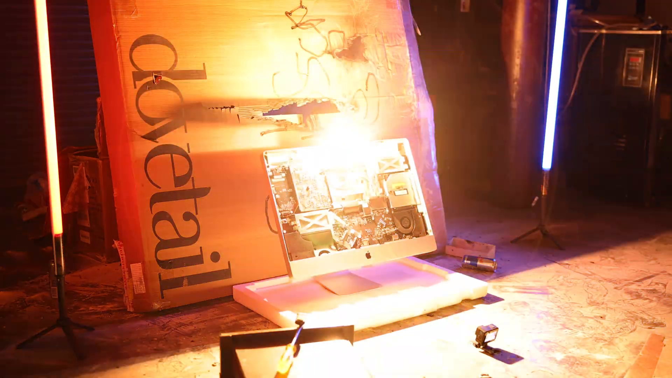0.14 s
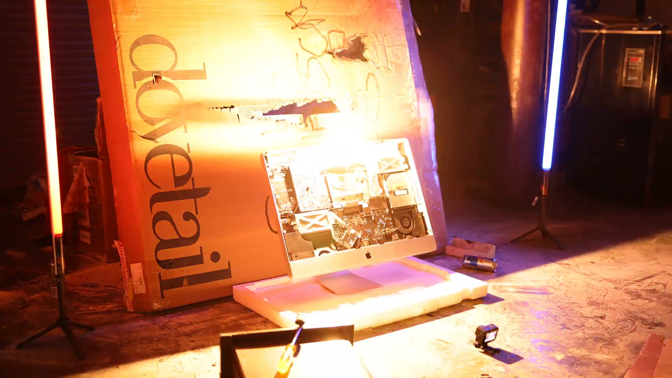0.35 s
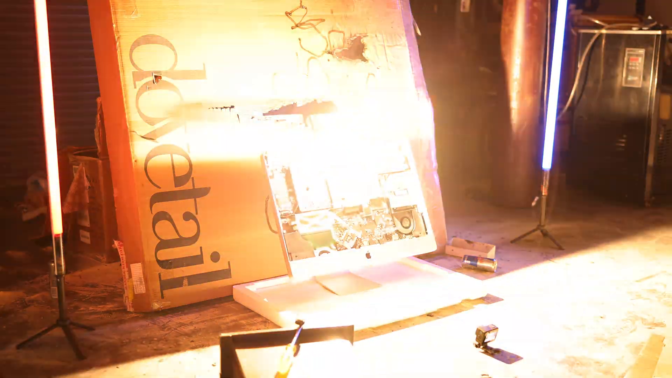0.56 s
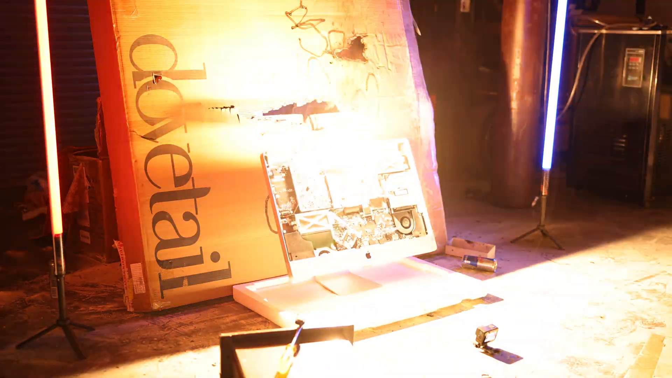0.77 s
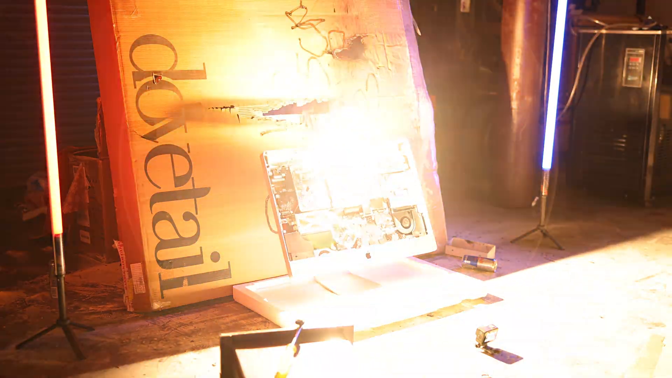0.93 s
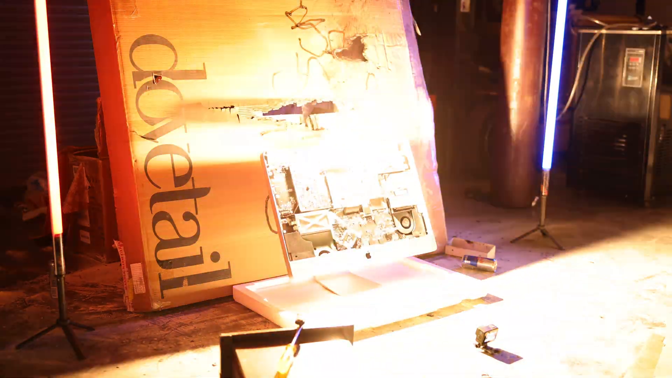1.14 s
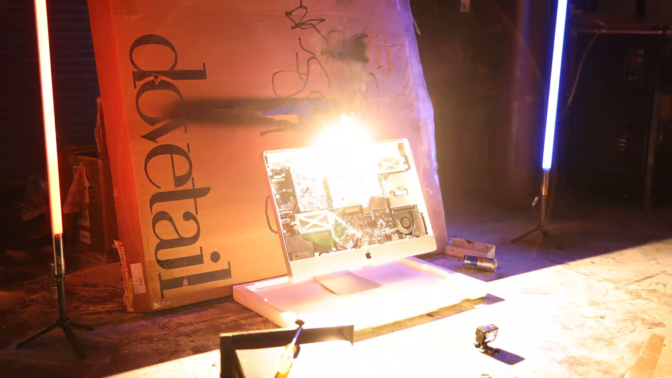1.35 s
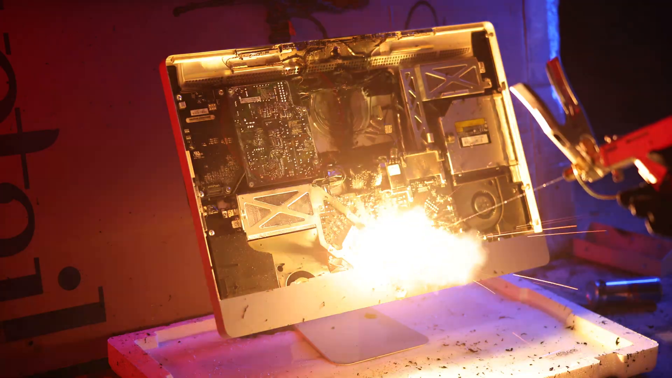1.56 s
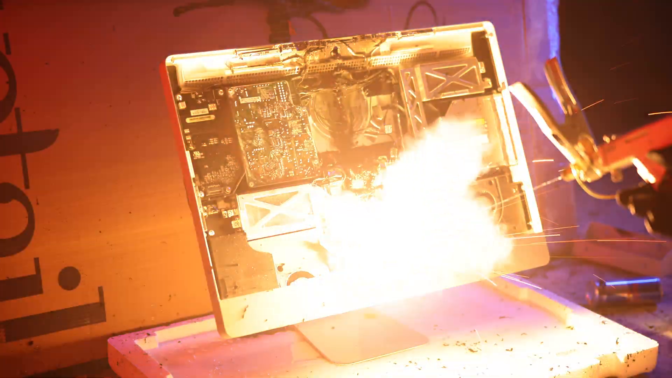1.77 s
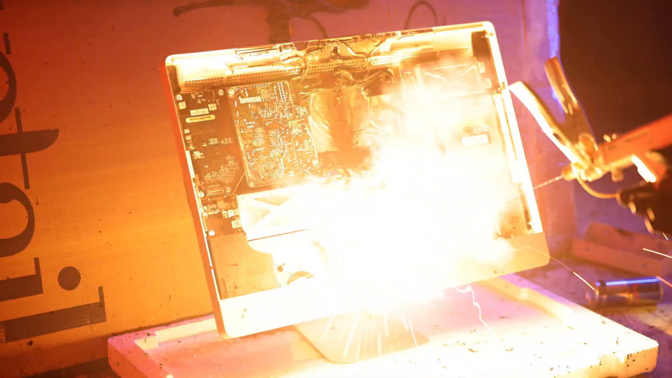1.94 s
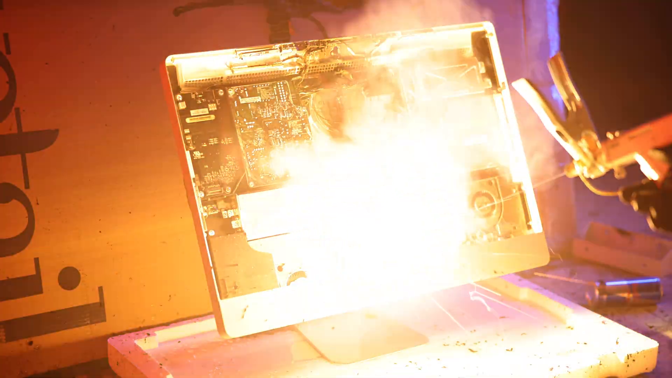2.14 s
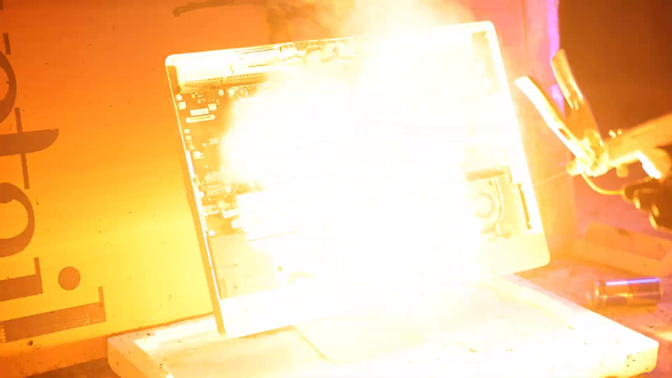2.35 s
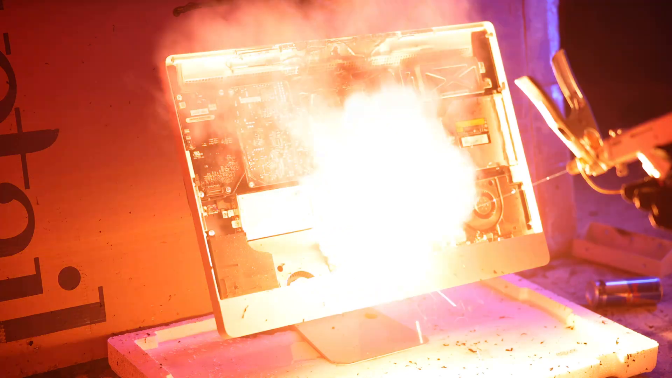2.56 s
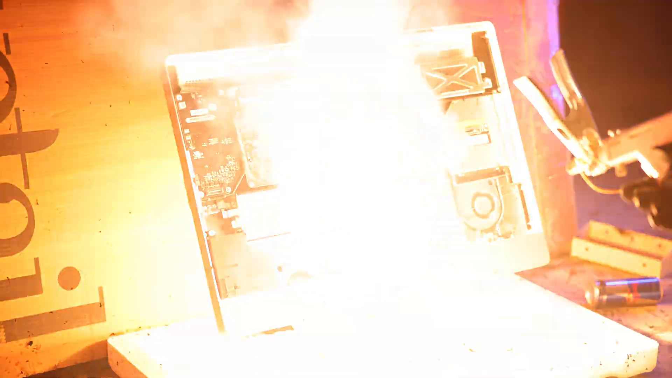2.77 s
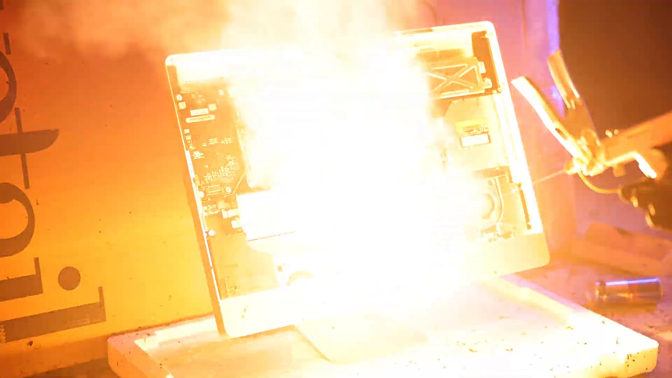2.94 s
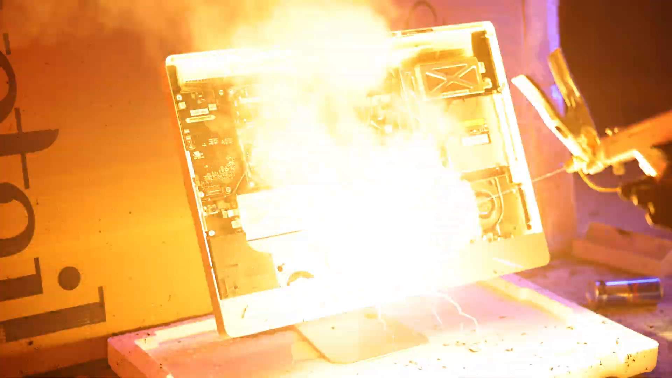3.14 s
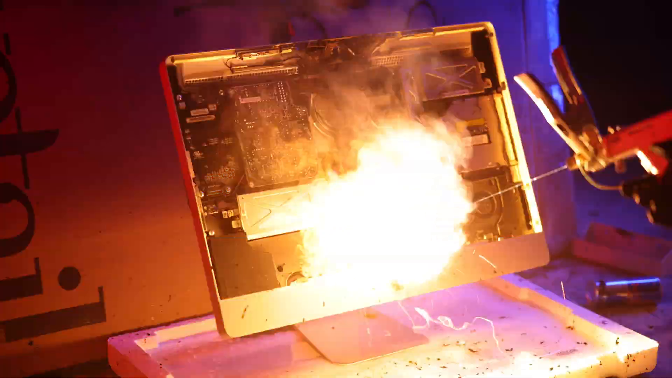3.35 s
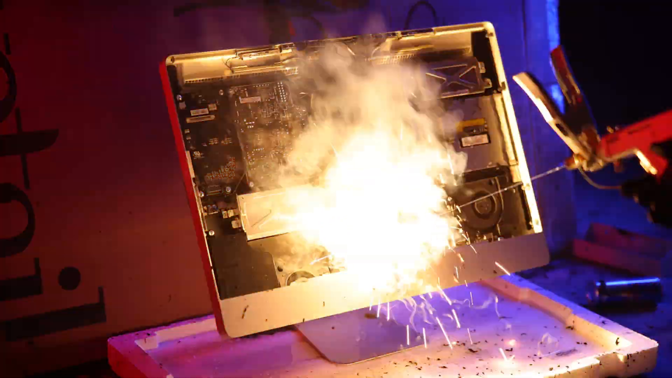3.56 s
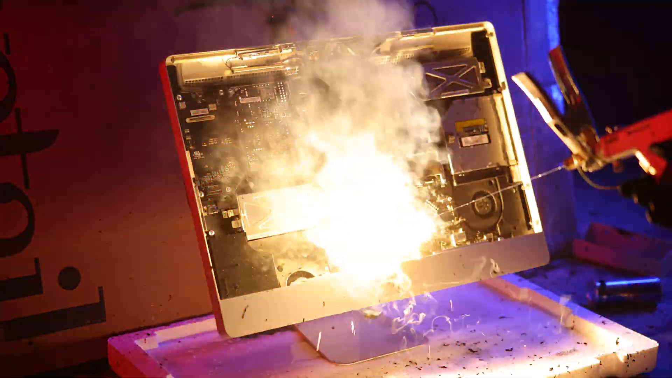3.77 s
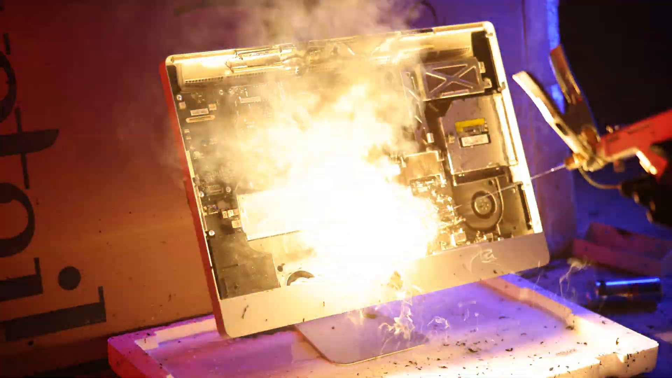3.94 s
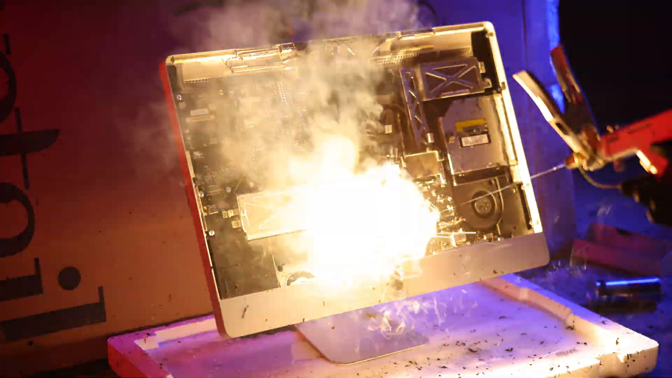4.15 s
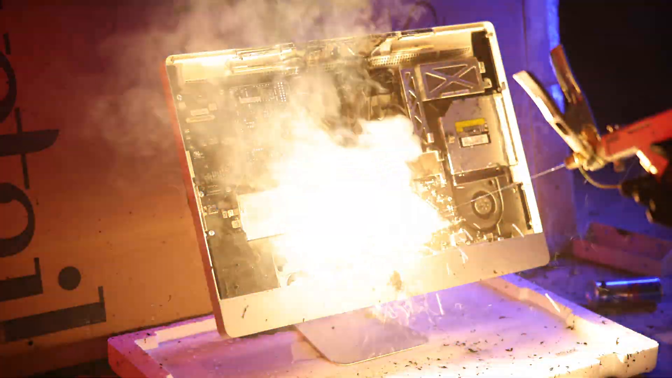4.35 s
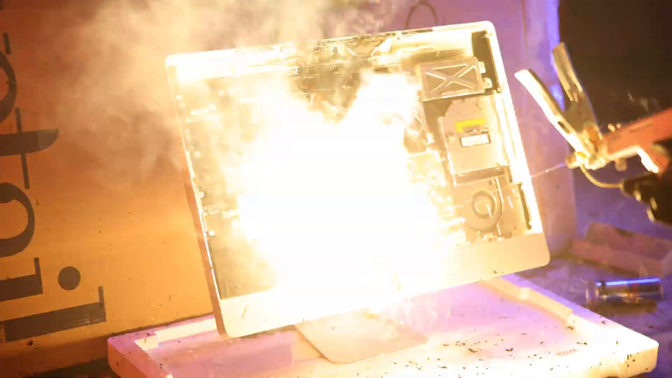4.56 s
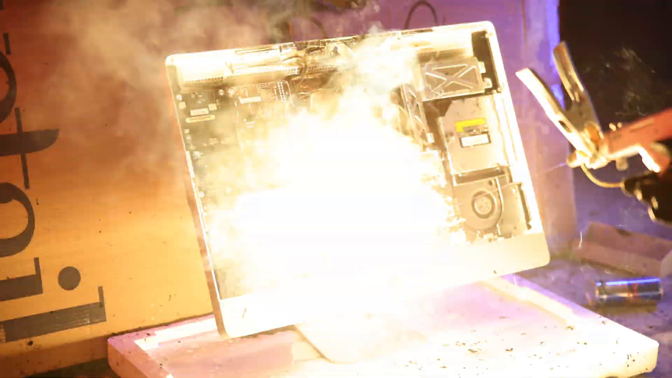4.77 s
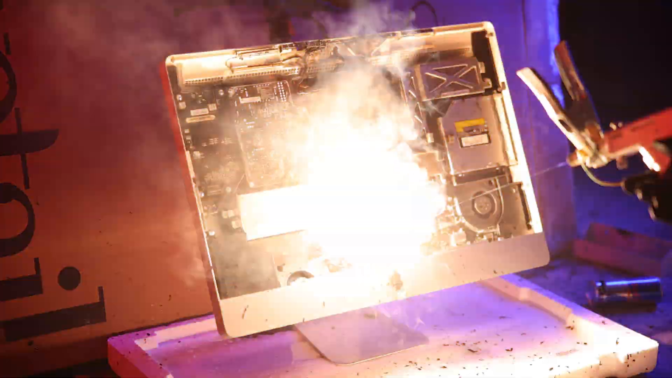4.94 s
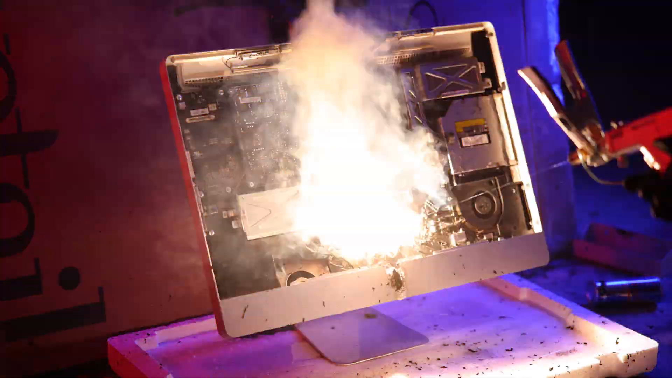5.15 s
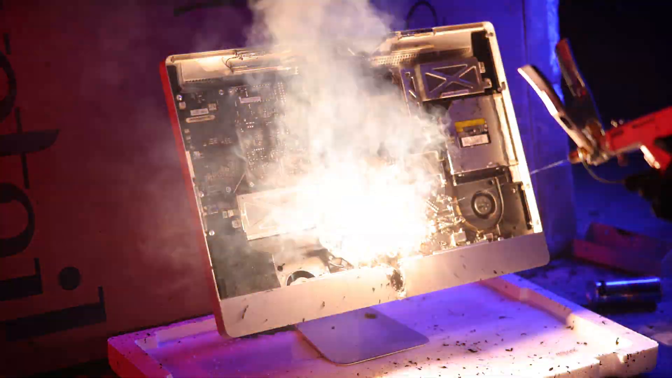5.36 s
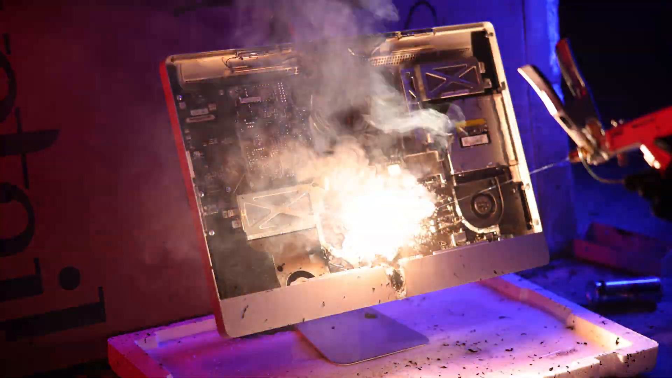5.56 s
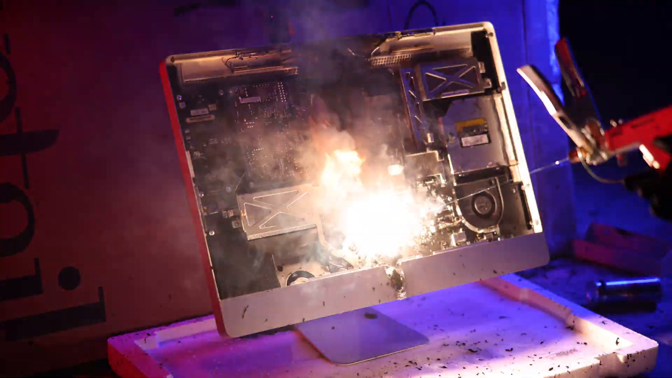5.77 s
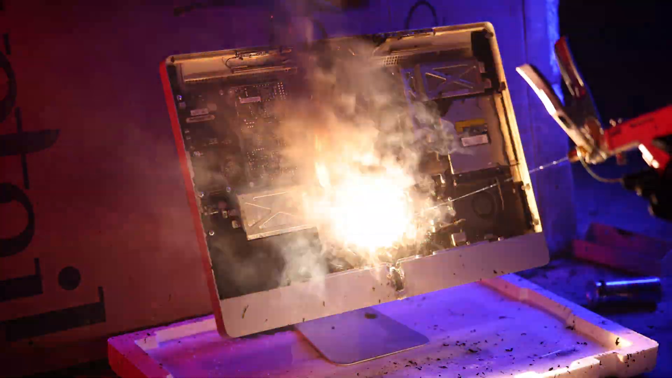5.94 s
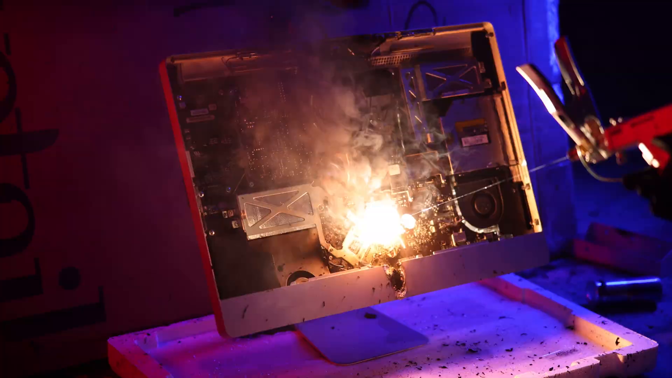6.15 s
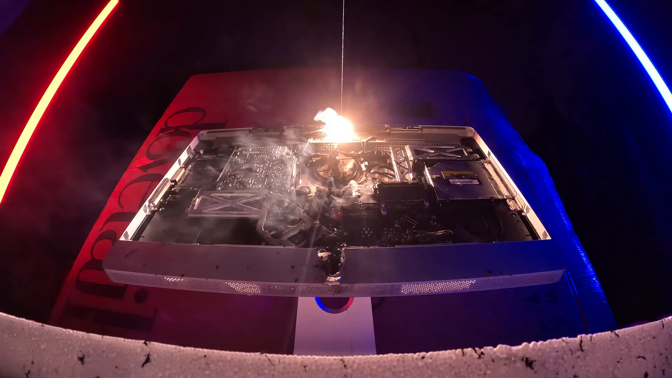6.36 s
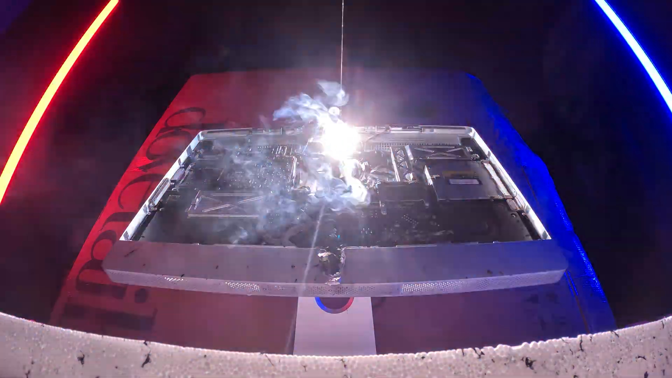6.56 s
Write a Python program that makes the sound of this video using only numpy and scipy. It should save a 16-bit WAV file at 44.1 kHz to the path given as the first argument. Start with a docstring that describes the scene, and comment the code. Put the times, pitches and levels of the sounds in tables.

```python
"""Laser burning into an open computer chassis

A faint flame flutters across the workshop; then, heard close, jets of vapour roar, sizzle and spit over mains
hum; at the end a stereo microphone stands beside the humming machine. The jets are turbulent noise with droplet
impulses, filtered by the resonances of a deepening hole; bursting parts send N-shaped shocks; hum is sines.
"""
import sys
import numpy as np
from scipy import signal
from scipy.fft import rfft, irfft
from scipy.io import wavfile

SR = 44100
rng = np.random.default_rng(int(sys.argv[2]) if len(sys.argv) > 2 else 0)


def inscribe(sig):
    """Save sig as 16-bit PCM at rate SR to the path in sys.argv[1].

    A 1-D sig is mono; a 2-D sig holds one channel per row.
    Samples are clipped to [-1, 1] before scaling.
    """
    pcm = np.round(np.clip(np.atleast_2d(sig).T, -1, 1) * 32767)
    wavfile.write(sys.argv[1], SR, pcm.astype(np.int16))


N = 291501

TAIL_T60_S = 0.35   # time for the fading tail of an earlier loud sound to fall 60 dB


def burn():
    """Source and resonator: a sputtering jet excites the hole, and gusts and spits modulate four bands of it."""
    # resonances of the hole at each stage: (centre [Hz], nominal width [Hz], relative level [dB])
    open_board = [(240, 295, 2), (495, 389, 4), (1054, 133, -6), (1499, 36, -5), (2296, 650, -5.5),
                  (3063, 340, -6.5), (3483, 210, -7), (4640, 870, -10), (5540, 660, -15.5), (6700, 360, -5),
                  (9060, 820, -16.5), (11800, 650, -10), (13700, 430, -28), (15200, 850, -22)]
    shallow_pit = [(296, 256, 0.5), (597, 194, 4.5), (1005, 120, -2.5), (1603, 104, -2.5), (2300, 490, 2.5),
                   (3160, 370, -0.5), (4100, 740, -8.5), (5100, 320, -2.5), (5600, 350, -11.5),
                   (6900, 680, 4.5), (8700, 640, -7), (10920, 560, -2.5), (11900, 940, -9),
                   (13300, 500, -9), (14600, 1400, -21)]
    deep_pit = [(298, 210, -12.5), (567, 240, -0.5), (1097, 185, -7.5), (1550, 174, -4), (1783, 127, -4),
                (2347, 280, 1.5), (3485, 510, -6.5), (4300, 320, -9.5), (5320, 790, -12), (5920, 290, -3.5),
                (6530, 250, -5), (6980, 160, -0.5), (7320, 400, -17), (8740, 440, -8), (11070, 740, -23),
                (12700, 410, -19), (14400, 1000, -39)]
    # spectrum of the broad noise between the resonances: (frequency [Hz], relative density [dB per Hz])
    jet_spectrum = [(20, -45), (60, -41), (120, 12.5), (250, 2.5), (600, -5), (1200, 5.5), (3000, -12.5),
                    (8000, 5.5), (11000, -4.5), (16000, -12.5)]
    # mains hum: (frequency [Hz], level [dB rms])
    hum_lines = [(118.4, -59.5)]
    deepens_s, crossfade_s = (3.48, 4.95), 0.18   # middle of each change of stage, and its length
    edges_hz = 70, 1350, 4700, 9900, 17000   # limits of roar, sizzle, hiss and spray
    spit_parts_db = -19.5, -8.5, 0, -13   # the same four in a spit, against its treble level
    # (resonances, broad noise [dB], flicker [dB]): the shallow pit chokes and clears the most
    stages = [(open_board, -9.0, 2.2), (shallow_pit, -9.0, 4.3), (deep_pit, -12.0, 1.8)]

    t = np.arange(N) / SR
    stage = sum(np.clip((t - s) / crossfade_s + .5, 0, 1) for s in deepens_s)
    parts = np.zeros((4, N))
    for k, (peaks, broad_db, flicker_db) in enumerate(stages):
        jet = sputter(1500.0, 4.48, -5.0, flicker_db)
        body = resonances(jet, peaks, patchy_db=2.7) + amp(broad_db) * coloured(jet, jet_spectrum)
        share = np.sqrt(np.clip(1 - abs(stage - k), 0, 1))   # equal-power crossfade
        parts += [share * unit(band(body, low, high)) for low, high in zip(edges_hz, edges_hz[1:])]
    gains = gusts()
    bursts = amp(np.c_[spit_parts_db].T) * spits(gains[2])
    # spits are the same jet, briefly stronger: powers add
    direct = np.sum(parts * np.hypot(gains, bursts), axis=0) + cracks()
    return direct + walls(direct) + tones(hum_lines, 2.6) + room_air()


def gusts():
    """Amplitude modulation: each gust rises fast, holds while it swells or sags, and falls into the lull."""
    # gusts: (start [s], hold [s], roar [dB], sizzle [dB], hiss [dB], swell during the hold [dB])
    gust_rows = [(1.532, 0.01, -28.5, -26.5, -31, -4.5), (1.606, 0.038, -35, -32.5, -32, 3.5),
                 (1.715, 0.067, -32.5, -26.5, -25.5, 1.5), (1.801, 0.015, -30.0, -24.5, -28, 4.5),
                 (1.865, 0.014, -24, -20, -20, -0.5), (1.899, 0.041, -28.5, -25, -26.0, 5),
                 (1.986, 0.064, -26.5, -28, -31.5, 6.0), (2.109, 0.029, -30, -33, -36.5, 6.5),
                 (2.209, 0.018, -24.5, -23, -26.5, -3.0), (2.252, 0.1, -19, -17.5, -21, -11),
                 (2.358, 0.045, -28, -25, -27, 1), (2.431, 0.096, -30.5, -29.5, -29, -0.5),
                 (2.55, 0.048, -44.5, -45, -48.5, 10.5), (2.64, 0.01, -36.0, -33.5, -29.5, 7.0),
                 (2.677, 0.072, -38, -36.0, -34, -6), (2.763, 0.094, -33.5, -33.0, -35.0, 5.5),
                 (2.913, 0.041, -31.5, -30.5, -29.0, 2.5), (3.029, 0.083, -30.5, -29.0, -22, -15.0),
                 (3.098, 0.05, -31.0, -35, -36.5, 2.5), (3.188, 0.063, -52.0, -38.5, -44.5, -3.5),
                 (3.259, 0.025, -34.5, -42.0, -53, 4.5), (3.381, 0.088, -29.5, -36.5, -38.5, -20),
                 (3.567, 0.11, -73.0, -62, -41.5, -1), (3.682, 0.12, -39, -30, -29, -9.5),
                 (3.838, 0.006, -49, -61, -44, 6.5), (3.909, 0.005, -45.5, -51, -40, -4),
                 (3.943, 0.087, -52, -40, -38.5, 14), (4.017, 0.082, -42.0, -34.5, -31.5, -7.5),
                 (4.126, 0.054, -52.0, -46.5, -37.5, 3.0), (4.197, 0.16, -55.0, -55, -49.5, -6),
                 (4.448, 0.0095, -38.5, -41.0, -39.5, -9.5), (4.484, 0.042, -46, -49, -44, -11),
                 (4.56, 0.047, -50, -42.5, -41.5, -1.0), (4.633, 0.054, -42.0, -36.0, -34.0, 5.5),
                 (4.699, 0.082, -34.5, -35, -32.5, -4.0), (4.87, 0.033, -33.5, -35.5, -35.5, 3.0),
                 (4.919, 0.049, -37.5, -33.0, -27, -10.0), (5.012, 0.068, -35.5, -37, -40.5, 0.0),
                 (5.098, 0.065, -43, -39.0, -35, 9.5), (5.189, 0.11, -43.5, -38.0, -31.5, 1),
                 (5.313, 0.055, -50, -36.5, -29.5, 3.0), (5.391, 0.053, -59, -39.5, -42, -0.5),
                 (5.51, 0.092, -47, -34, -31.5, -2.0), (5.644, 0.024, -54, -47, -45, -1),
                 (5.718, 0.096, -62, -40.0, -33.5, 3.5), (5.833, 0.0034, -37.5, -30.5, -30.5, 5),
                 (5.858, 0.064, -45, -35.5, -29, 1.0), (5.953, 0.04, -39.5, -33.5, -32, -1.5),
                 (6.022, 0.049, -48, -46, -38, -1.5), (6.109, 0.045, -62, -44.0, -34.5, -7.5),
                 (6.225, 0.012, -60, -63, -46.5, 6.0), (6.294, 0.066, -63.0, -36.5, -39, -6.0),
                 (6.365, 0.055, -59.0, -39, -29.5, -4.5)]
    # burn between gusts, and spray relative to the whole hiss, gusts included:
    # (time [s], roar [dB], sizzle [dB], hiss [dB], relative spray [dB])
    lull_rows = [(1.54, -44.5, -46, -39, -6), (1.85, -27, -30.5, -48, -7.5), (2.17, -38, -40.5, -44, -13.5),
                 (2.62, -38.5, -46, -51, -8.5), (3.0, -41.5, -40.0, -32.5, -9),
                 (3.34, -44, -59, -55.5, -10.0), (3.53, -58, -61, -55, -6.5), (3.9, -63, -58.0, -59, -12.5),
                 (4.4, -56, -64, -58, -4.5), (4.85, -45, -49, -48, -12.5), (5.0, -39.5, -40.5, -44, -11.5),
                 (5.47, -53, -47.5, -41.5, -12.5), (5.7, -44.5, -41.5, -42, -15.5),
                 (6.2, -58.5, -59, -52.0, -7.5), (6.41, -48.5, -41, -35.0, -20.0)]
    rise_db_per_s, fall_db_per_s = 900, 470
    ignition_s = 1.5362
    smoulder_db = -61, -77, -77, -88   # before the beam bites: roar, sizzle, hiss, spray

    t = np.arange(N) / SR
    *lull_db, spray_db = in_time(lull_rows)
    power = amp(2 * np.array(lull_db))
    for s, hold_s, *parts_db, swell_db in gust_rows:
        near = slice(round((s - .05) * SR), round((s + hold_s + .15) * SR))
        hold_s = max(hold_s, .002)
        u = t[near] - s
        rise_db = rise_db_per_s * np.minimum(u, 0)
        held_db = swell_db * np.clip(u / hold_s, 0, 1)
        fall_db = fall_db_per_s * np.maximum(u - hold_s, 0)
        power[:, near] += amp(2 * (np.c_[parts_db] + rise_db + held_db - fall_db))
    spray_power = power[2] * amp(2 * spray_db)
    gains = np.sqrt(np.vstack([power, spray_power]))
    return np.where(t < ignition_s, amp(np.c_[smoulder_db].T), gains)


def spits(hiss):
    """Impulse response of a transient: every spit swells to its top and dies away as x exp(1 - x)."""
    # spits of vapour at set times, strong and faint: (start [s], treble level at the top [dB])
    timed_spits = [(1.5357, -24), (1.624, -27.5), (1.7863, -29), (1.819, -15.5), (1.924, -17.5),
                   (2.0203, -19.5), (2.2047, -24), (2.38, -28), (3.6111, -44), (3.6766, -26), (3.689, -26),
                   (3.703, -30), (3.7276, -27), (3.742, -27), (3.76, -31), (3.773, -31), (3.7857, -30),
                   (3.8147, -35), (3.84, -30.5), (3.9075, -43), (3.9343, -34.5), (3.946, -33),
                   (3.9564, -37), (3.9718, -30), (4.1339, -31), (4.144, -32), (4.1624, -33.5),
                   (4.1968, -40), (4.3033, -48), (4.3654, -51), (4.4063, -58), (4.4403, -32.5),
                   (4.558, -33), (4.583, -35), (4.6059, -29.5), (4.6388, -32), (4.6687, -29.5),
                   (4.8698, -34), (5.5793, -31), (5.6056, -33), (5.8275, -24), (5.9623, -31), (6.2302, -46)]
    top_s = 0.0025   # time from start to top
    small_per_s, small_db, small_spread_db = 15, -2, 3.2   # the rest come by chance, near the hiss level

    chance = rng.random(N) < small_per_s / SR
    starts = chance * hiss * amp(small_db + small_spread_db * rng.standard_normal(N))
    for s, db in timed_spits:
        starts[round(s * SR)] = amp(db)
    x = np.arange(round(8 * top_s * SR)) / SR / top_s
    return np.abs(signal.fftconvolve(starts, x * np.exp(1 - x))[:N])


def cracks():
    """Shock wave: a bursting part sends an N-shaped pulse, its echo off the board and a short noisy wake."""
    # bursting parts: (time [s], shock level before the band-pass [dB])
    bursting_parts = [(1.5369, -4), (1.626, -15), (1.8264, -4), (1.928, -8), (2.6500, -7), (3.029, -12),
                      (4.027, -13), (4.64, -11.5), (4.899, -16), (5.83, -24)]
    shock_s, echo_s, wake_t60_s = .0002, .00036, 0.0062

    out = np.zeros(N)
    t = np.arange(round(0.0055 * SR)) / SR
    shock = np.where(t < shock_s, 1 - 2 * t / shock_s, 0)
    shock = shock + .7 * np.roll(shock, round(echo_s * SR))
    for s, db in bursting_parts:
        wake = 0.098 * amp(-60 * t / wake_t60_s) * rng.standard_normal(len(t))
        add(out, s, amp(db) * (shock + wake))
    return band(out, 1500, 15000)


def resonances(x, peaks, patchy_db):
    """Parallel resonance: steep two-pole resonators that the moving flame feeds unevenly, rms 1."""
    out = 0
    for k, (hz, width, db) in enumerate(peaks):
        r = np.exp(-np.pi * 1.3 * max(width, 30) / SR)   # pole radius; widened, as each is applied twice
        sos = [(1 - r * r) / 2, 0, (r * r - 1) / 2, 1, -2 * r * np.cos(2 * np.pi * hz / SR), r * r]
        feed = amp(db + patchy_db * np.clip(drift(8.7), -2, 2))
        out = out + (-1) ** k * feed * signal.sosfilt([sos, sos], x)
    return unit(out)


def sputter(per_s, spread_db, crackle_db, flicker_db):
    """Turbulence with Poisson impulses: noise and bursting droplets flicker as the jet chokes and clears."""
    sizes = amp(spread_db * np.minimum(rng.exponential(1, N), 4)) * rng.choice([-1, 1], N)
    droplets = unit(sizes * (rng.random(N) < per_s / SR))
    turbulence = rng.standard_normal(N) + amp(crackle_db) * droplets
    return unit(turbulence * amp(flicker_db * np.minimum(drift(140.0), 2)))


def far_flame():
    """Band-limited combustion noise: the burn across the room, a dull flutter over fans, with a few snaps."""
    # spectra of the flutter and of the hiss: (frequency [Hz], relative density [dB per Hz])
    flame_spectrum = [(24, -72), (40, -52), (125, -8.5), (194, -12), (267, -9), (394, -11), (422, -18),
                      (526, -10), (953, -23.5), (1430, -14.5), (2300, -21), (2990, -65), (5060, -120)]
    hiss_spectrum = [(1180, -52), (2000, -6), (2330, -2), (2540, -5), (2940, -1), (3340, -4.5), (5790, -12),
                     (6410, -6.5), (7610, -14), (8960, -6), (15500, -26)]
    # fans of the workshop: (frequency [Hz], level [dB rms])
    fan_lines = [(129.2, -85), (226.1, -74.5), (279.9, -81), (387.6, -74), (516.8, -79), (1082, -81.5),
                 (1211, -91)]
    # distant snaps: (time [s], peak level [dB], frequency [Hz])
    snap_rows = [(.138, -45.5, 7500), (.228, -48, 1550), (0.295, -51, 6500), (0.489, -48, 1480)]
    tail_sizzle_db, snap_t60_s = -57.5, .002

    low, edge, hiss = far_levels()
    flame = coloured(sputter(300.0, 2.0, -3.5, 1.5), flame_spectrum)
    out = low * unit(band(flame, 40, 720))
    out += edge * unit(band(band(flame, 830, 1870), 500, 1900))
    out += hiss * coloured(sputter(200.0, 3.1, -12.0, 1.7), hiss_spectrum)
    out += tones(fan_lines, 2.5)
    tail = amp(tail_sizzle_db - 60 * np.arange(N) / SR / TAIL_T60_S)
    out += tail * unit(band(rng.standard_normal(N), 2760, 3600))
    t = np.arange(round(.01 * SR)) / SR
    for s, db, hz in snap_rows:
        add(out, s, amp(db - 60 * t / snap_t60_s) * np.sin(2 * np.pi * hz * t))
    return out


def far_levels():
    """Incoherent addition: resting flame, fading tail of an earlier loud sound and bell-shaped puffs add in power."""
    # puffs: (top [s], half-width at 1/e amplitude [s], flutter [dB], brighter edge [dB])
    puff_rows = [(.16, .04, -64, -72), (.25, .05, -63.5, -64), (.34, .05, -66, -85), (.48, .03, -72, -68),
                 (.6, 0.064, -60.5, -63), (.8, 0.049, -59, -66), (.9, .05, -66, -73), (1.08, .05, -68, -65),
                 (1.2, .04, -66, -70), (1.28, .08, -64, -74)]
    rest_db = -67.5, -75.5, -79   # flutter, its brighter edge, thin hiss
    tail_db = -57, -48, -57.5   # the same three in the fading tail, at time zero
    puff_hiss_db = -19   # hiss of a puff against its flutter

    t = np.arange(N) / SR
    power = amp(2 * np.c_[rest_db].T) + amp(2 * (np.c_[tail_db].T - 60 * t / TAIL_T60_S))
    for s, width_s, low_db, edge_db in puff_rows:
        bell = np.exp(-2 * ((t - s) / width_s) ** 2)
        power = power + amp(2 * np.c_[low_db, edge_db, low_db + puff_hiss_db].T) * bell
    return np.sqrt(power)


def machine_side():
    """Mid-side stereo: hum, rumble and crackle with a frequency-dependent width, and damped sine pops."""
    # noise levels: (time [s], rumble [dB], crackle [dB])
    noise_levels = [(6.42, -28, -40.5), (6.462, -31, -34), (6.492, -32, -47), (6.54, -27.5, -25.5),
                    (6.598, -32, -42.5), (6.61, -26.5, -36)]
    # hum of the machine: (frequency [Hz], level [dB rms])
    machine_hum = [(64.6, -41), (118.4, -28), (242.2, -39)]
    # noise spectrum: (frequency [Hz], relative density [dB per Hz])
    air_spectrum = [(15, -20), (30, -18), (50, -6), (90, -7), (160, -12), (400, -16), (1000, -14),
                    (1700, -20.5), (2300, -23), (3300, -29), (5800, -21), (7500, -24), (16000, -66)]
    # shape of the stereo width: (frequency [Hz], relative side against mid [dB])
    width_spectrum = [(60, -24), (110, -23), (200, -13), (380, -19), (700, -16), (1290, -12), (2380, -6),
                      (4400, -14), (8120, -15), (15000, 4)]
    # sharp pops: (time [s], level of the sine [dB], frequency [Hz], left minus right [dB])
    pop_rows = [(6.4537, -9.5, 820, -2), (6.507, -20, 5600, 0), (6.5333, -11, 1280, -3),
                (6.5345, -15.5, 2130, -4), (6.540, -17.5, 1920, 0), (6.584, -20, 1500, 0)]
    side_db, pop_t60_s = -10.5, 0.0069

    rumble_db, crackle_db = in_time(noise_levels)
    mid = coloured(sputter(800, 3, -12, 1.5), air_spectrum)
    side = amp(side_db) * coloured(sputter(890.0, 2.9, -15.0, 1.4), air_spectrum, width_spectrum)
    air = mid + side * [[1], [-1]]
    rumble = amp(rumble_db) * unit(band(air, 28, 1150))
    crackle = amp(crackle_db) * unit(band(air, 1400, 17000))
    out = rumble + crackle + tones(machine_hum, 1.7)
    t = np.arange(round(.012 * SR)) / SR
    for s, db, hz, pan_db in pop_rows:
        snap = np.sin(2 * np.pi * hz * t) + 0.28 * band(rng.standard_normal((2, len(t))), 500, 7000)
        balance_db = np.array([[pan_db], [-pan_db]]) / 2
        add(out, s, amp(db + balance_db - 60 * t / pop_t60_s) * snap)
    return out


def walls(x):
    """Reverberation: convolution with a dense dull noise tail that decays exponentially."""
    t60_s, level_db = 0.41, -15.5
    t = np.arange(round(.4 * SR)) / SR
    tail = band(rng.standard_normal(len(t)), 153, 7700) * amp(-60 * t / t60_s)
    tail = tail * (t > .006)   # silent before the first reflections
    return amp(level_db) * signal.fftconvolve(x, tail / np.sqrt(np.sum(tail ** 2)))[:N]


def room_air():
    """Stationary background noise: the steady air of the workshop."""
    # spectrum: (frequency [Hz], relative density [dB per Hz])
    room_spectrum = [(20, -39), (60, -24), (150, 0), (600, 0), (925, -17), (1080, -5.5), (3700, -18.5),
                     (6000, -31), (8000, -43)]
    return amp(-56.5) * coloured(rng.standard_normal(N), room_spectrum)


def tones(lines, waver_db):
    """Line spectrum: steady sines of random phase whose levels waver."""
    t = np.arange(N) / SR
    out = 0
    for hz, db in lines:
        level = np.sqrt(2) * amp(db + waver_db * drift(14.0))   # rms to peak
        out = out + level * np.sin(2 * np.pi * (hz * t + rng.random()))
    return out


def drift(rate):
    """Low-passed noise of spread 1: each of two poles at rate [Hz], the joint corner somewhat lower."""
    r = np.exp(-40 * np.pi * rate / SR)   # double pole, at every 20th sample
    noise = rng.standard_normal(N // 20 + 2002)
    slow = signal.lfilter([1], [1, -2 * r, r * r], noise)[2000:]   # settled part
    return np.interp(np.arange(N) / 20, np.arange(len(slow)), unit(slow))


def coloured(x, *spectra):
    """Spectral shaping: adds the dB of the given spectra to x on a log-frequency axis, rms 1."""
    log_hz = np.log(np.arange(N // 2 + 1) * SR / N + 1)
    db = 0
    for spectrum in spectra:
        hz, level_db = np.transpose(spectrum)
        db = db + np.interp(log_hz, np.log(hz), level_db)
    return unit(irfft(rfft(x) * amp(db), N))


def band(x, low_hz, high_hz):
    """Band-pass filtering: keeps what lies between two corner frequencies."""
    return signal.sosfilt(signal.butter(3, [low_hz, high_hz], "band", fs=SR, output="sos"), x)


def amp(db):
    """Decibel law: the amplitude gain of a level in dB."""
    return 10 ** (np.asarray(db) / 20)


def unit(x):
    """Normalisation: scales x to rms 1."""
    return x / np.sqrt(np.mean(x ** 2) + 1e-20)


def in_time(rows):
    """Linear interpolation: the columns of a curve table, sample by sample."""
    s, *columns = np.transpose(rows)
    return [np.interp(np.arange(N) / SR, s, c) for c in columns]


def add(out, s, sound):
    """Superposition: mixes a short sound in at time s."""
    at = round(s * SR)
    out[..., at:at + sound.shape[-1]] += sound[..., :N - at]


def scene():
    """Listening distance: three microphones, far, close and stereo beside the machine, one after the other."""
    close_s, stereo_s = 1.491, 6.414   # the microphone changes
    t = np.arange(N) / SR
    mono = np.where(t < close_s, far_flame(), burn())
    fade_out = np.clip(1 - (t - stereo_s) / 0.011, 0, 1)   # the close one fades under the stereo one
    fade_in = np.clip((t - stereo_s) / .001, 0, 1)
    return mono * fade_out + machine_side() * fade_in


def record(dry):
    """Saturation and band limit: tanh rounds the loudest peaks and an elliptic low-pass cuts the top."""
    cutoff_hz = 15830
    rounded = .8 * np.tanh(dry / .8)
    return signal.sosfilt(signal.ellip(14, .5, 70, cutoff_hz, fs=SR, output="sos"), rounded)


dry = scene()
out = record(dry)
inscribe(out)
```